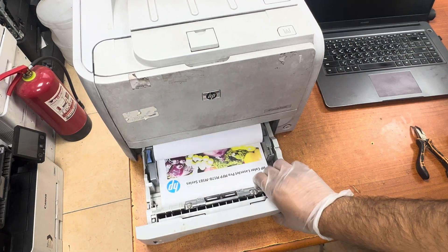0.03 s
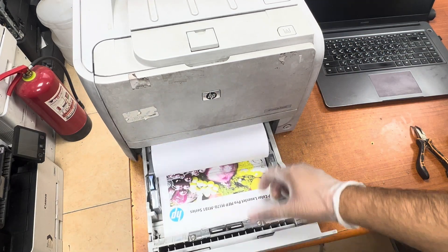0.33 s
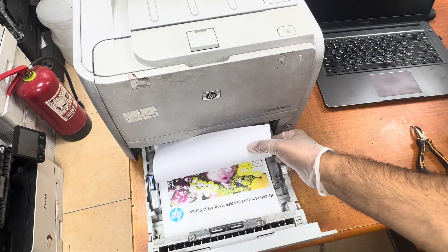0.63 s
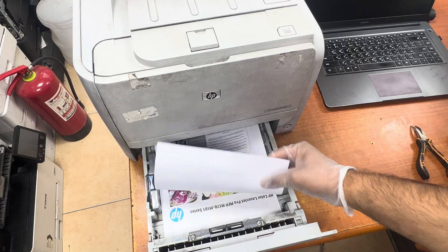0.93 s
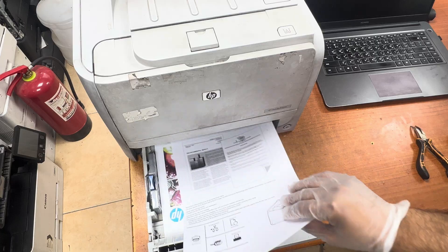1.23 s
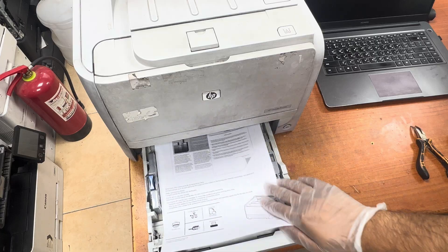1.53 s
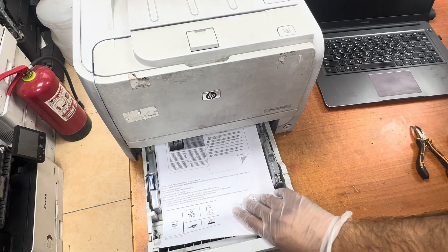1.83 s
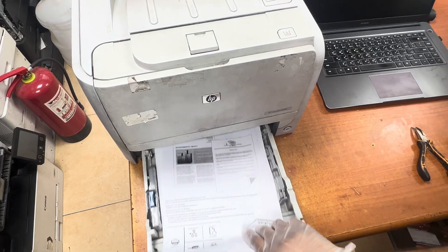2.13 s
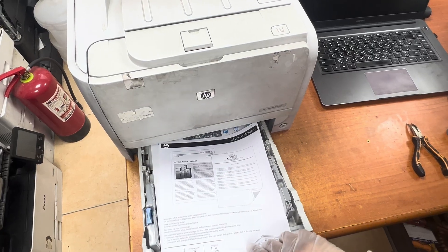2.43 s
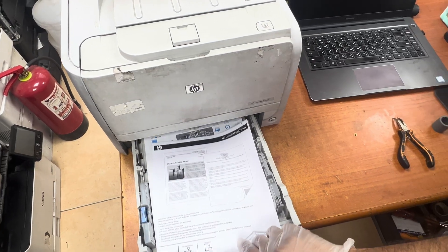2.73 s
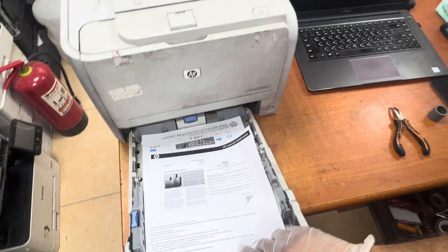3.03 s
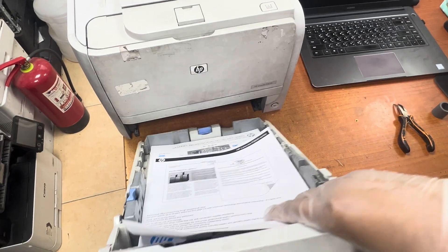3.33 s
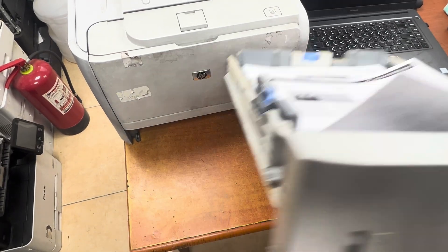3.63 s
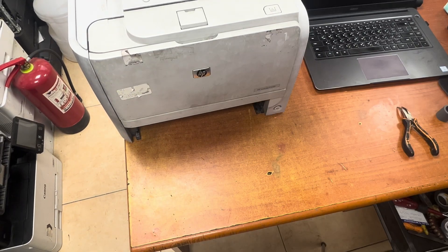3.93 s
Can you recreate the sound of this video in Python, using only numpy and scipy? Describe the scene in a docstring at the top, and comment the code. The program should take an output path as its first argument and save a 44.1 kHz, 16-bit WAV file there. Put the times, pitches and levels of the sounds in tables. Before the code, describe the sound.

Plastic paper tray handled with rustling sheets, sharp clacks and a scraping slide.

```python
"""A plastic printer tray is tugged out a little with a bump and a groan (0.2 s). Paper hisses in and is
patted down (from 0.5 s). A guide snaps into place (2.0 s); the stack's edge sings as it is pushed home.
The tray scrapes and squeaks along its rails (2.8 s), clacks over its end stop (3.1 s) and rattles as it
is lifted away (3.6 s). Contacts and friction ring the plastic parts and the desk.
A small, quiet room with a low hum answers throughout."""
import sys
import numpy as np
from scipy import signal
from scipy.fft import rfft, irfft, next_fast_len
from scipy.io import wavfile
from scipy.ndimage import uniform_filter1d, map_coordinates

SR = 44100
rng = np.random.default_rng(int(sys.argv[2]) if len(sys.argv) > 2 else 0)


def wrap_up_sound(samples):
    """Save the sound to the file named by the first command line argument, as 16-bit audio."""
    columns = np.atleast_2d(samples).T
    # keep every value between -1 and 1, then stretch to whole-number steps
    tamed = np.clip(columns, -1, 1)
    steps = np.round(tamed * 32767).astype(np.int16)
    wavfile.write(sys.argv[1], SR, steps)


N = 176400

# sharp plastic clacks: peak_s, contact_s, thump_db, tray_db, guide_db, crack_db
CLACKS = [(2.0225, 0.0099, -54, -36.5, -25, -18.5), (2.118, 0.0077, -53, -37.5, -52, -27.5),
          (2.745, 0.013, -65, -51, -58, -45.5), (3.0728, 0.0046, -34, -18.5, -24, -24),
          (3.0762, .024, -31, -24, -29, -19), (3.143, .014, -49, -30, -49, -35),
          (3.238, 0.022, -71, -45, -50, -36.5)]
# hand and stack knock on the tray: peak_s, thump_db, tray_db, guide_db, crack_db
KNOCKS = [(.167, -47, -41.5, -65, -59), (.196, -55, -47, -65, -33), (.352, -58, -32.5, -62, -43),
          (.527, -49.5, -51, -61, -49.5), (.705, -65, -43.5, -60, -58), (.793, -52, -45, -55, -54),
          (.859, -49.5, -45.5, -58, -57), (1.181, -71, -48, -51, -61), (1.464, -51.5, -59, -44.5, -68),
          (1.823, -57, -44.5, -40.5, -60), (1.926, -54, -45, -48, -53), (2.188, -52.5, -42, -64, -65),
          (2.797, -50, -42.5, -44, -47), (3.067, -40.5, -30.5, -36, -37), (3.097, -34.5, -31, -47, -36)]
# single-part contacts: peak_s, contact_s, level_db
CHASSIS_BOOMS = [(.352, 0.089, -43.5)]  # tray shakes the whole printer
HOUSING_BUMPS = [(.195, 0.013, -31.5), (.217, 0.015, -34)]  # tray hits the hollow housing
RATCHET_SNAPS = [(2.0222, 0.0029, -18.5), (2.1175, 0.0023, -39.5)]  # guide's ratchet hits the thin walls
CATCH_CLICKS = [(2.745, .008, -45.5), (3.238, 0.0078, -34)]  # end-stop catch comes free
# loose tray parts: peak_s, contact_s, ring_db, tick_db
RATTLES = [(0.202, 0.04, -44, -53), (0.353, 0.043, -36, -63), (3.587, .018, -67, -58.5),
           (3.671, 0.039, -42.5, -50), (3.688, 0.048, -43.5, -51), (3.781, 0.017, -47, -43),
           (3.922, 0.022, -47.5, -55)]

# paper on paper: peak_s, rise_s, hold_s, fade_s, hiss_db, body_db
PAPER_STROKES = [(0.021, 0.095, 0.027, 0.1, -58, -55), (0.47, 0.012, 0.0098, 0.038, -52.5, -64),
                 (0.533, 0.0073, 0.016, 0.037, -53, -58), (0.635, 0.0036, 0.027, 0.062, -56.5, -65.5),
                 (0.672, 0.046, 0.064, 0.039, -46, -54), (0.906, 0.13, 0.012, .11, -49, -57),
                 (1.048, 0.047, 0.0093, 0.12, -57, -61), (1.199, .01, 0.14, 0.2, -61.5, -66.5),
                 (1.508, 0.11, 0.077, 0.15, -52.5, -57), (1.826, 0.0097, 0.031, 0.064, -69, -50),
                 (1.89, 0.044, 0.072, 0.14, -53.5, -53.5), (2.268, 0.19, 0.1, 0.14, -48, -56.5),
                 (2.544, 0.0089, 0.076, 0.027, -63, -66.5)]
# plastic on rails and tray floor: peak_s, rise_s, hold_s, fade_s, rumble_db, ring_db, hiss_db
SCRAPES = [(0.188, 0.034, 0.016, 0.058, -51, -45, -38.5), (.325, 0.072, 0.027, 0.036, -55, -44.5, -52.5),
           (0.683, 0.053, .04, .058, -56.5, -55.5, -73), (.862, 0.014, 0.053, 0.057, -61, -61, -70),
           (1.072, 0.031, 0.022, 0.039, -69, -53, -76), (2.836, .06, 0.036, 0.027, -50, -44.5, -47.5),
           (3.133, .05, 0.019, 0.079, -46, -40.5, -49.5)]
# tray slides: peak_s, rise_s, hold_s, fade_s, level_db
RAIL_SKIDS = [(2.968, 0.0081, 0.034, .02, -48.5), (3.03, 0.041, 0.026, .04, -39)]  # just before the end stop
DESK_DRAGS = [(2.841, 0.049, 0.024, 0.034, -40.5), (3.274, .04, 0.018, 0.022, -50)]
# short friction tones: start_s, length_s, pitch_hz, level_db
RAIL_SQUEAKS = [(2.829, .05, 5030, -46.5), (3.16, 0.0061, 5100, -34.5)]
SHEET_RASPS = [(.68, 0.019, 5020, -45), (.898, 0.031, 4710, -47.5), (1.83, 0.058, 3890, -51.5),
               (2.24, 0.16, 3650, -54.5)]
# gliding friction tones: time_s, pitch_hz, level_db
STACK_EDGE_GLIDE = [(2.17, 1597, -57), (2.2, 1502, -49), (2.26, 1330, -59.5), (2.36, 1315, -61.5),
                    (2.45, 1295, -63), (2.52, 1240, -90)]
TRAY_GROAN_GLIDE = [(.24, 339.7, -67), (.29, 367.6, -50.5), (.325, 412, -44.5), (.365, 487, -46),
                    (.385, 478, -56), (.42, 440, -69)]

# resonances: centre_hz, width_hz, gain_db
TRAY_MODES = [(694, 20, -1), (741, 22, 3), (956, 61, 2), (1118, 100, 0.5), (1214, 120, 1), (1357, 99, 4.5),
              (1615, 130, 3), (1797, 102, 3.5), (1924, 120, 1), (2013, 88, 4.5), (2287, 355, -2),
              (3390, 277, -3.5), (3656, 495, -6)]
GUIDE_MODES = [(742, 35, 1.5), (863, 42, 10.5), (1430, 28, 4.5), (1620, 49, -3.5), (1900, 64, -2.5),
               (2380, 70, -5), (2490, 80, -2.5)]
DESK_MODES = [(244, 80, -5), (316, 32.5, 4), (360, 25, 3.5), (470, 79, 0), (662, 86, 1)]
CHASSIS_MODES = [(193, 29, 0)]
HOUSING_MODES = [(353, 47, -2.5), (640, 50, -1), (738, 45, 1.5), (1103, 45, -2), (1730, 60, -2),
                 (2140, 110, -2.5), (3295, 150, -2), (3800, 190, -7)]
THIN_WALL_MODES = [(2510, 110, -0.5), (3450, 70, 3.5), (4730, 265, -4.5), (5920, 410, 7), (7800, 540, -3),
                   (10500, 340, 1.5), (14050, 630, 2)]
CATCH_MODES = [(814, 52, -8), (1510, 90, -0.5), (1894, 140, 3)]
UNDERSIDE_MODES = [(434, 49, -6), (758, 43, 3.5), (942, 49, 4), (1230, 70, 4), (1740, 79, -4.5)]
LOOSE_PART_MODES = [(716, 710, -0.5), (1640, 240, -1), (1794, 140, 0), (2300, 124, 3.5), (2590, 330, -0.5),
                    (3250, 130, 3.5), (4060, 590, -2.5), (5300, 310, -7), (5670, 220, -5.5)]
# noise spectra: freq_hz, density_db
CRACK_SPECTRUM = [(300, -62), (900, -18), (2200, 8), (2900, 0.5), (3700, 6), (5800, 6.5), (7000, 1),
                  (10000, 6), (16000, 0)]
PAPER_SPECTRUM = [(400, -44), (1500, -17), (2900, -4.5), (4200, -3.5), (7000, -2), (11000, -1.5),
                  (16000, 3.5)]
STACK_SPECTRUM = [(150, -7), (400, -8), (850, 0.5), (1400, -0.5), (2300, -1.5), (2900, -13.5), (3800, 1.5),
                  (4800, -8), (9000, -17.5), (16000, -18)]
RAIL_SPECTRUM = [(500, -28), (2000, -8), (2900, 8), (3800, 4), (6400, 2.5), (9000, 3), (14000, 4),
                 (16000, 4.5)]
SKID_SPECTRUM = [(1000, -6.5), (3500, -12.5), (4700, -11), (5400, 1.5), (6300, -12), (7900, -1.5),
                 (11500, -5), (13650, 3.5), (15500, -2)]
AIR_SPECTRUM = [(15, -4), (26, 0), (40, -12), (60, -4.5), (100, -5.5), (160, -13.5), (330, -15), (550, -19),
                (800, -18), (1200, -25.5), (3000, -36.5), (7000, -43), (16000, -42.5)]

# reflection decay: freq_hz, t60_s
NEAR_DECAY = [(200, 0.2), (2000, 0.15), (15000, 0.13)]  # desk and printer housing
ROOM_DECAY = [(150, 0.45), (1000, 0.23), (4000, 0.36), (15000, 0.11)]
# room hum: pitch_hz, level_db
HUM_TONES = [(25, -57.5), (92, -69)]

KNOCK_CONTACT_S, THIN_WALL_DB = 0.025, -8.5
CRACKLE_PER_S, CRACKLE_DB, HAND_WAVER_DB = 160, -13, 3.14
NEAR_DB, ROOM_DB, AIR_DB = -6.5, -14, -53.5
CUTOFF_HZ = 15780


def blows(rows, rise_s, body_lag_s, body_stretch):
    """Each contact thumps the desk, rings tray and guide, and cracks."""
    thump, tray, guide, snap = np.zeros((4, N))
    for peak_s, contact_s, thump_db, tray_db, guide_db, crack_db in rows:
        for force, level_db in (thump, thump_db), (tray, tray_db), (guide, guide_db):
            force += amp(level_db) * chatter(peak_s + body_lag_s, rise_s, body_stretch * contact_s)
        snap += amp(crack_db) * chatter(peak_s, rise_s, contact_s)
    body = resonate(thump, DESK_MODES) + resonate(tray, TRAY_MODES) + resonate(guide, GUIDE_MODES)
    return body + crack(snap)


def crack(force):
    """Dry crack plus the short ring of thin plastic walls."""
    return colour(force, CRACK_SPECTRUM) + amp(THIN_WALL_DB) * resonate(force, THIN_WALL_MODES)


def struck_parts():
    """Chassis, housing, thin walls and catch each ring at their own contacts."""
    out = np.zeros(N)
    for rows, modes in [(CHASSIS_BOOMS, CHASSIS_MODES), (HOUSING_BUMPS, HOUSING_MODES),
                        (RATCHET_SNAPS, THIN_WALL_MODES), (CATCH_CLICKS, CATCH_MODES)]:
        force = sum(amp(level_db) * chatter(peak_s, rise_s=0.0045, fade_s=contact_s)
                    for peak_s, contact_s, level_db in rows)
        out += resonate(force, modes)
    return out


def paper():
    """Sliding sheets hiss and crackle; stack and tray add body; bending shifts the spectrum."""
    hiss, body = np.zeros((2, N))
    for *timing_s, hiss_db, body_db in PAPER_STROKES:
        push = swell(*timing_s)
        hiss += amp(hiss_db) * push
        body += amp(body_db) * push
    hand = amp(HAND_WAVER_DB * wobble(70))
    fibres = unit_rms(grit(900, depth_db=2.0) + amp(CRACKLE_DB) * crackle(CRACKLE_PER_S, spread_db=4))
    sheets = colour(hiss * fibres, PAPER_SPECTRUM)
    stack = colour(body * grit(400, depth_db=5.5), STACK_SPECTRUM)
    return flicker(hand * (sheets + stack), depth_db=1.83)


def scrapes():
    """Plastic judders on plastic, shaking tray and desk."""
    rumble, ring, hiss = np.zeros((3, N))
    for *timing_s, rumble_db, ring_db, hiss_db in SCRAPES:
        pull = swell(*timing_s)
        rumble += amp(rumble_db) * pull
        ring += amp(ring_db) * pull
        hiss += amp(hiss_db) * pull
    slips = grit(350, depth_db=3.0)
    body = resonate(rumble * slips, DESK_MODES) + resonate(ring * slips, TRAY_MODES)
    return body + colour(hiss * slips, RAIL_SPECTRUM)


def drag():
    """The tray's hollow underside judders over the desk."""
    pull = sum(amp(level_db) * swell(*timing_s) for *timing_s, level_db in DESK_DRAGS)
    return resonate(pull * grit(300, depth_db=1.5), UNDERSIDE_MODES)


def skid():
    """Smooth plastic sliding fast: bright, gritty hiss."""
    pull = sum(amp(level_db) * swell(*timing_s) for *timing_s, level_db in RAIL_SKIDS)
    hiss = colour(pull * grit(500, depth_db=4.0), SKID_SPECTRUM)
    return flicker(hiss, depth_db=2.5)


def rattles():
    """Small loose parts tick and ring higher than the tray."""
    ring, tick = np.zeros((2, N))
    for peak_s, contact_s, ring_db, tick_db in RATTLES:
        ring += amp(ring_db) * chatter(peak_s, rise_s=0.0036, fade_s=contact_s)
        tick += amp(tick_db) * chatter(peak_s, rise_s=0.0024, fade_s=contact_s)
    return resonate(ring, LOOSE_PART_MODES) + crack(tick)


def squeaks(rows, scatter_hz):
    """Stick-slip: short, unsteady tones, each on its own pitch."""
    drift_cycles = np.cumsum(scatter_hz * wobble(2500)) / SR
    shake = unit_rms(amp(2.5 * wobble(400)))
    t, out = time_s(), np.zeros(N)
    for start_s, length_s, pitch_hz, level_db in rows:
        progress = np.clip((t - start_s) / length_s, 0, 1)
        arch = np.sqrt(np.abs(np.sin(np.pi * progress)))
        out += amp(level_db) * arch * shake * np.sin(2 * np.pi * (pitch_hz * t + drift_cycles))
    return out


def friction_glide(points, scatter_hz):
    """Rough friction tone; its pitch curve stands for the sliding speed."""
    knot_s, pitch_hz, level_db = np.transpose(points)
    t = time_s()
    sliding = (t > knot_s[0]) & (t < knot_s[-1])
    freq_hz = np.interp(t, knot_s, pitch_hz) + scatter_hz * wobble(1500)
    rough_db = 1.5 * wobble(250)
    tone = unit_rms(np.sin(2 * np.pi * np.cumsum(freq_hz) / SR) * amp(rough_db))
    return sliding * amp(np.interp(t, knot_s, level_db)) * tone


def chatter(peak_s, rise_s, fade_s):
    """Contact noise burst with a flat spectrum; rise_s and fade_s each span 20 dB."""
    size = SR // 10
    t = np.arange(size) / SR - size / SR / 2
    envelope = amp(-20 * np.minimum(np.maximum(-t / rise_s, t / fade_s), 10))
    burst = rng.standard_normal(size) * envelope
    for _ in range(4):  # whiten, then confine in time again
        spectrum = rfft(burst)
        burst = irfft(spectrum / (np.abs(spectrum) + 1e-12), size) * envelope ** 0.25
    burst *= np.linalg.norm(envelope) / np.linalg.norm(burst)
    padded = np.zeros(N + 2 * size)
    start = round(peak_s * SR) + size // 2
    padded[start:start + size] = burst
    return padded[size:size + N]


def swell(peak_s, rise_s, hold_s, fade_s):
    """Stroke envelope, held from peak_s; rise_s and fade_s each span 20 dB."""
    t = time_s() - peak_s
    decades = np.maximum(-t / rise_s, 0) + np.maximum((t - hold_s) / fade_s, 0)
    return amp(-20 * np.minimum(decades, 10))


def grit(slips_per_s, depth_db):
    """Friction noise: tiny slips of uneven size, rms 1."""
    return unit_rms(rng.standard_normal(N) * amp(depth_db * np.clip(wobble(slips_per_s), -2, 2)))


def crackle(ticks_per_s, spread_db):
    """Sparse ticks of uneven size, rms 1."""
    ticks = rng.random(N) < ticks_per_s / SR
    return unit_rms(ticks * amp(spread_db * np.clip(rng.standard_normal(N), -2, 2)))


def flicker(x, depth_db):
    """Shifting patches of the spectrum rise and dip."""
    frames = signal.stft(x, nperseg=512)[2]
    patches = uniform_filter1d(rng.standard_normal(frames.shape), size=6, axis=0)
    patches = uniform_filter1d(patches, size=9, axis=1)
    return signal.istft(frames * amp(depth_db * unit_rms(patches)))[1][:N]


def resonate(x, modes):
    """Resonator bank, alternating polarity, unit mean power gain."""
    def response(hz):
        gain = sum((-1) ** k * amp(db) * 1j * hz * width_hz / (centre_hz**2 - hz**2 + 1j * hz * width_hz)
                   for k, (centre_hz, width_hz, db) in enumerate(modes))
        return gain / np.sqrt(np.mean(np.abs(gain) ** 2))
    return fft_filter(x, response)


def colour(x, spectrum):
    """Smooth spectral shaping, unit mean power gain."""
    return fft_filter(x, lambda hz: unit_rms(amp(log_interp(spectrum, hz))))


def fft_filter(x, response):
    """Apply the gain response(hz)."""
    size = next_fast_len(N + SR // 2)
    return irfft(rfft(x, size) * response(np.fft.rfftfreq(size, 1 / SR)), size)[:N]


def wobble(knots_per_s):
    """Smooth random curve."""
    return map_coordinates(rng.standard_normal(N), [time_s() * knots_per_s + 2], mode="wrap")


def log_interp(points, hz):
    """Interpolate (freq_hz, value) points on a log axis."""
    knot_hz, values = np.transpose(points)
    return np.interp(np.log(hz + 1), np.log(knot_hz + 1), values)


def amp(db):
    """Decibels to gain."""
    return 10 ** (np.asarray(db) / 20)


def unit_rms(x):
    """Scale to rms 1."""
    return x / np.sqrt(np.mean(x ** 2) + 1e-20)


def time_s():
    """Time of every sample."""
    return np.arange(N) / SR


def reflections(x, decay, onset_s, blocks=24):
    """Diffuse tail with a t60 per frequency; new for each block, as the sound moves about."""
    out, size = np.zeros(N + 2 * SR), N // blocks
    for start in range(0, N, size):
        hz, t, noise = signal.stft(rng.standard_normal(SR // 2), SR, nperseg=256)
        fade = amp(-60 * t / log_interp(decay, hz)[:, None])
        build_up = 1 - np.exp(-t / onset_s)
        tail = signal.istft(noise * fade * build_up, SR)[1]
        wet = signal.fftconvolve(x[start:start + size], tail / np.linalg.norm(tail))
        out[start:start + len(wet)] += wet
    return out[:N]


def room_tone():
    """Steady low air noise with a faint hum."""
    hum = sum(amp(level_db) * np.sqrt(2) * np.sin(2 * np.pi * pitch_hz * time_s() + wobble(4.5))
              for pitch_hz, level_db in HUM_TONES)
    return amp(AIR_DB) * colour(rng.standard_normal(N), AIR_SPECTRUM) + hum


def scene():
    """Handling sounds, reflections and room tone, mono."""
    clacks = blows(CLACKS, rise_s=0.0034, body_lag_s=0.0006, body_stretch=1.61)
    knock_rows = [(peak_s, KNOCK_CONTACT_S, *levels_db) for peak_s, *levels_db in KNOCKS]
    knocks = blows(knock_rows, rise_s=0.0046, body_lag_s=0, body_stretch=0.9)
    direct = clacks + knocks + paper() + struck_parts() + scrapes() + drag() + skid() + rattles()
    direct += squeaks(RAIL_SQUEAKS, scatter_hz=396.6)
    direct += squeaks(SHEET_RASPS, scatter_hz=599)
    direct += friction_glide(STACK_EDGE_GLIDE, scatter_hz=166.4)
    direct += friction_glide(TRAY_GROAN_GLIDE, scatter_hz=90.5)
    near = amp(NEAR_DB) * reflections(direct, NEAR_DECAY, onset_s=0.0042)
    room = amp(ROOM_DB) * reflections(direct, ROOM_DECAY, onset_s=0.012)
    return (direct + near + room + room_tone())[None]


def record(dry):
    """Brick-wall low-pass."""
    return fft_filter(dry[0], lambda hz: hz < CUTOFF_HZ)[None]


dry = scene()
out = record(dry)
wrap_up_sound(out)
```